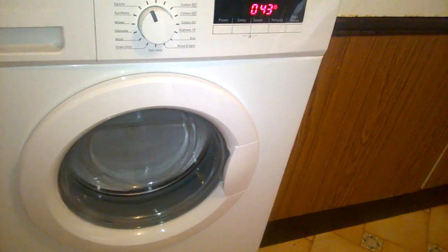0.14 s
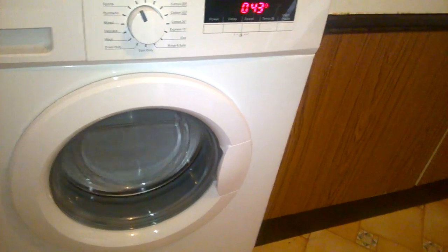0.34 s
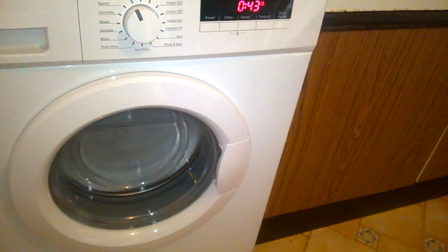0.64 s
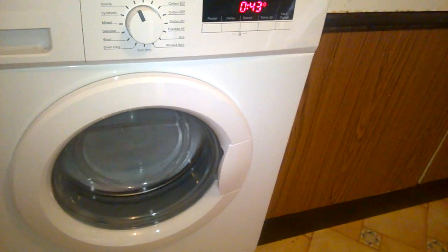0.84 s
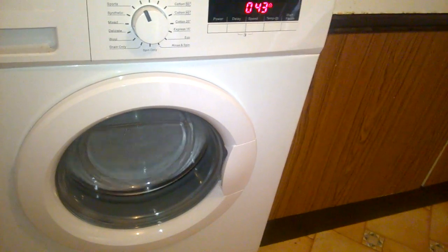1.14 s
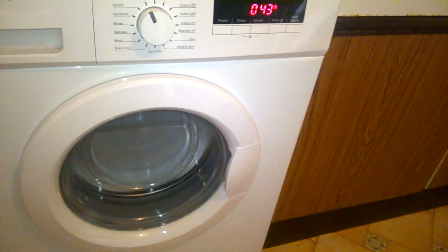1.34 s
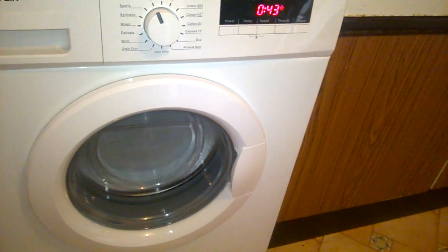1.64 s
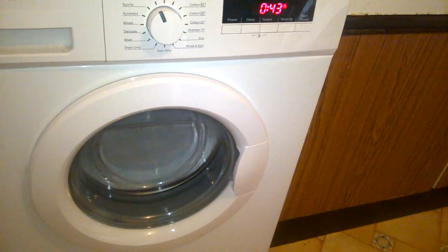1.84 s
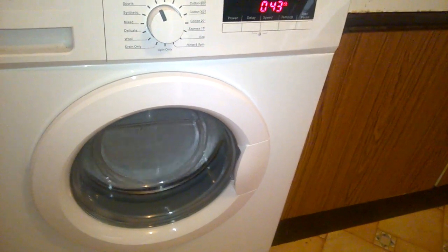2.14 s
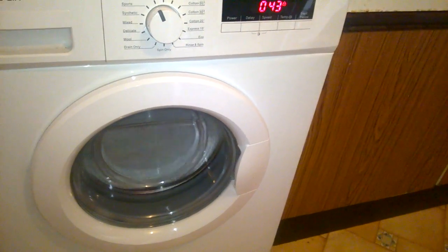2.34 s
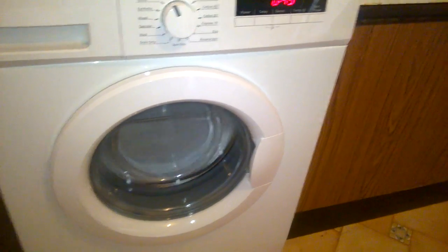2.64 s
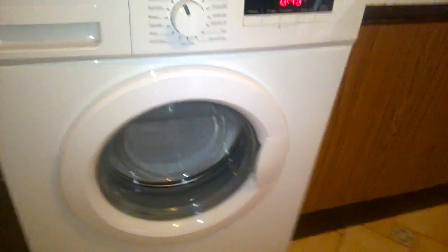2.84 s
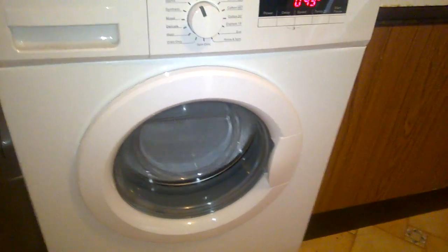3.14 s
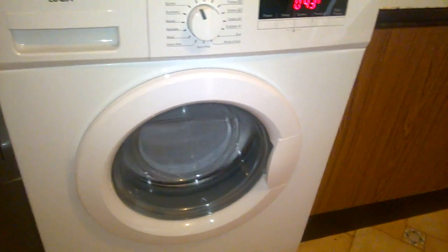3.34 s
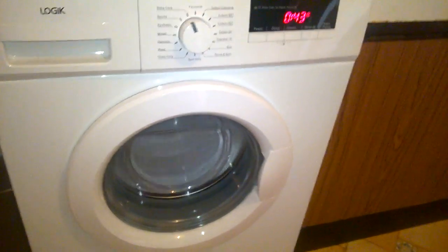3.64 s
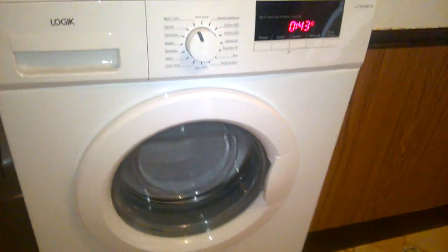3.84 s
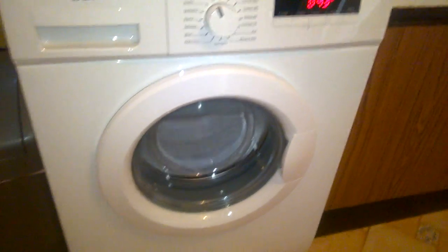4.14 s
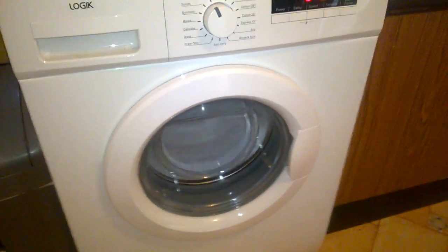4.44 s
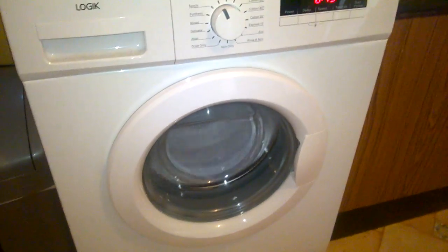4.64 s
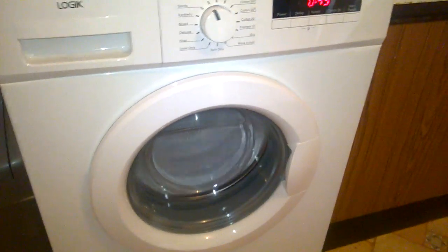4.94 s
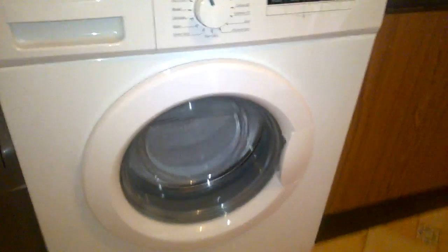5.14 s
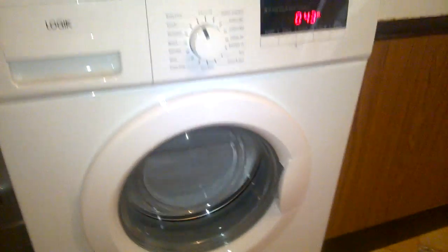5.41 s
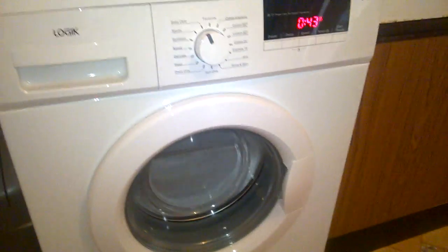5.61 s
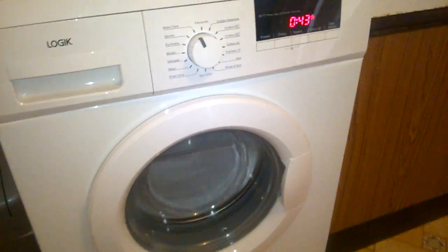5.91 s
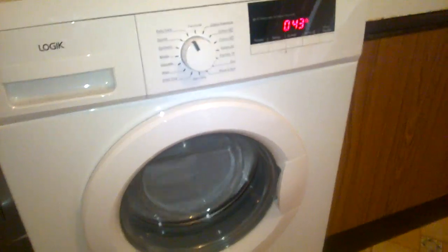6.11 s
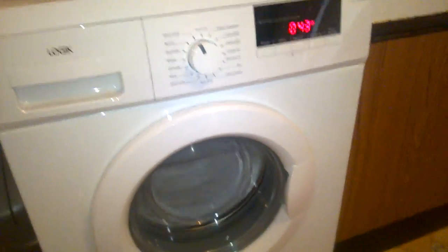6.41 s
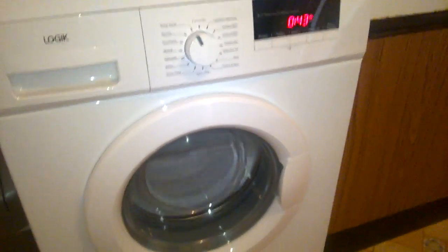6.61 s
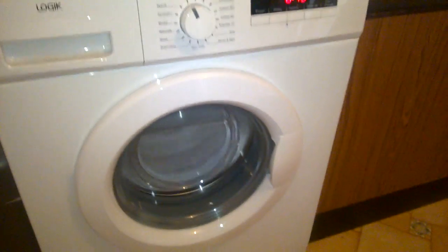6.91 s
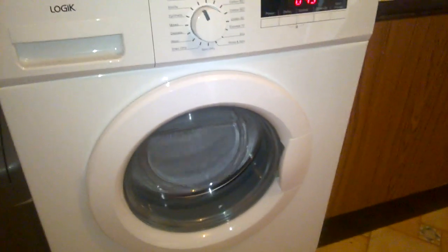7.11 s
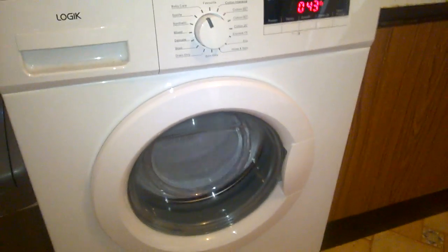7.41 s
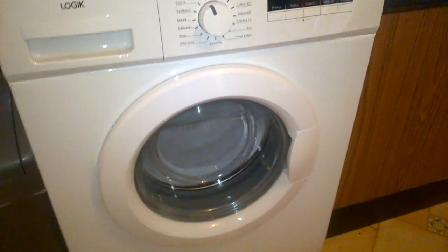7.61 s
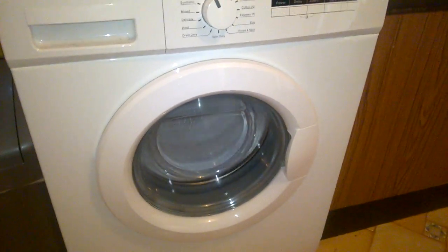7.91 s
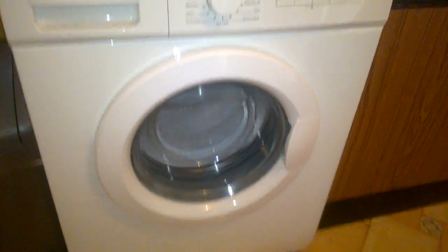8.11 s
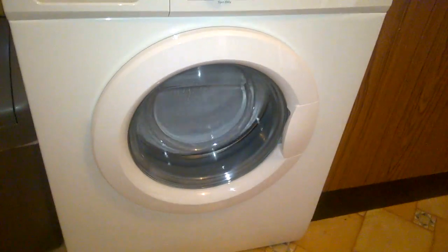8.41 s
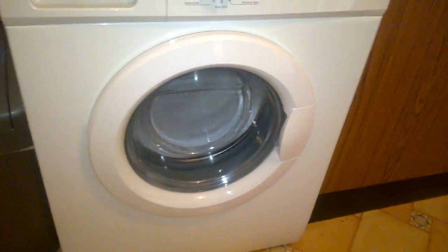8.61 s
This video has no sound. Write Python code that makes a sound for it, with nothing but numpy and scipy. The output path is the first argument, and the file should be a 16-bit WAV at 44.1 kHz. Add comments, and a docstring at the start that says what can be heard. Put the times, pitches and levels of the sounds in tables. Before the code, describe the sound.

Steady washing machine spin cycle with a piercing, fluttering motor whine, buzzing drum hum and hiss, a small click midway and handling rustle at the end.

```python
"""A front-loading washing machine spins at steady speed in a tiled kitchen, heard from a drifting hand-held phone.
The unbalanced drum shakes the cabinet on multiples of its turn; belt ribs and steady panel tones hum along.
A brushed motor, belted to the drum, whines on its 18 rotor slots over a comb of brush tones.
Every pass of the belt joint and of the drum's heavy side tugs the motor and dents the whine.
Bearings rumble and cooling air hisses beneath; fingers rub the phone, and near the end a hand slides over it."""
import sys
import numpy as np
from scipy import signal
from scipy.fft import rfft, irfft, next_fast_len
from scipy.io import wavfile
from scipy.ndimage import uniform_filter1d, map_coordinates

SR = 44100
rng = np.random.default_rng(int(sys.argv[2]) if len(sys.argv) > 2 else 0)


def gain_from_decibels(decibels):
    """Convert decibel values to linear amplitude factors."""
    exponent = np.asarray(decibels, float) / 20
    return 10 ** exponent


def log_audio(samples):
    """Write samples as a 16-bit WAV file to the path given in sys.argv[1]."""
    # one column per channel
    frames = np.atleast_2d(samples).T
    # limit to full scale, then quantise
    limited = np.clip(frames, -1, 1)
    pcm = np.round(limited * 32767).astype(np.int16)
    wavfile.write(sys.argv[1], SR, pcm)


N = 386316
TIME = np.arange(N) / SR

DRUM_HZ, BELT_HZ, SHAFT_HZ, MAINS_HZ = 10.132, 7.492, 116.52, 50.0  # turns or cycles a second
SLOTS = 18  # rotor slots, so whine cycles in each shaft turn


def unit(x):
    """Scaled to rms 1."""
    return x / np.sqrt(np.mean(np.abs(x) ** 2))


def curves(rows):
    """One value per sample for each column after the time."""
    s, *cols = np.transpose(rows)
    return [np.interp(TIME, s, c) for c in cols]


def wobble(rate):
    """A smooth random curve, rate knots a second."""
    coarse = TIME[::32]
    knots = rng.standard_normal(int(N * rate / SR) + 4)
    return np.interp(TIME, coarse, map_coordinates(knots, [coarse * rate]))


def noise(gain):
    """Noise coloured by a gain of frequency."""
    m = next_fast_len(N)
    hz = np.fft.rfftfreq(m, 1 / SR)
    re, im = rng.standard_normal((2, len(hz)))
    return irfft((re + 1j * im) * np.sqrt(m / 2) * gain(hz), m)[:N]


def rush(points, lo_hz, hi_hz):
    """Noise with a (frequency [Hz], gain [dB]) spectrum, of rms 1 between two frequencies."""
    f, db = np.transpose(points)
    gain = lambda hz: gain_from_decibels(np.interp(np.log(hz + 1), np.log(f + 1), db))
    band_power = np.sum(gain(np.arange(lo_hz, hi_hz)) ** 2) * 2 / SR
    return noise(gain) / np.sqrt(band_power)


def periodic(orders, turns, drift, start=None, count=2 ** 14):
    """A wave that repeats each turn; echoes at shifting strength let every multiple swell on its own."""
    k, db = np.transpose(orders)
    phase = rng.random((len(k), 3)).T  # in cycles: the direct wave, then two echoes
    if start:
        phase[0] = start(k, phase[0] - .5)
    lines = np.zeros((3, count // 2 + 1), complex)
    lines[:, k.astype(int)] = gain_from_decibels(db) * np.exp(2j * np.pi * phase) * count / np.sqrt(2)
    place = turns % 1 * count
    direct, *echoes = [np.interp(place, np.arange(count), w, period=count) for w in irfft(lines)]
    mixed = direct + drift * sum(wobble(0.865) * e for e in echoes)
    return mixed / np.sqrt(1 + 2 * drift ** 2)


def in_step(k, chance):
    """Six knocks a turn keep multiples 7, 13, 19.. together; the rest push against them, in cycles."""
    looseness = np.where(k < 7, 1, (k / 30) ** 2)  # low and high multiples hold step less well
    return .1 + .45 * (k % 6 != 1) + chance * looseness


# cabinet shaking, strongest multiples: (multiple of the drum turn, level [dB rms])
DRUM_SHAKES = [(2, -53.0), (3, -61.0), (4, -58.5), (5, -59.5), (6, -62.0), (7, -44.5), (9, -60.5),
               (10, -59.0), (11, -52.5), (12, -55.5), (13, -35.5), (14, -48.0), (15, -47.0), (16, -59.5),
               (17, -63.5), (18, -56.0), (19, -47.5), (20, -54.5), (21, -55.0), (23, -61.0), (24, -63.5),
               (25, -54.5), (27, -60.5), (29, -61.0), (31, -55.5)]
# weaker multiples above those: level of the first [dB rms], loss a multiple [dB], chance spread [dB]
TAIL_ORDERS = np.arange(32, 45)
TAIL_DB, TAIL_FALL_DB, TAIL_SCATTER_DB = -66.5, 0.5, 0.5


def drum():
    """The unbalanced load shakes the cabinet on multiples of the drum turn."""
    k = TAIL_ORDERS
    tail_db = TAIL_DB - TAIL_FALL_DB * (k - k[0]) + TAIL_SCATTER_DB * rng.standard_normal(len(k))
    orders = np.vstack([DRUM_SHAKES, np.transpose([k, tail_db])])
    turns = DRUM_HZ * TIME + 0.0025 * wobble(2.01)
    return periodic(orders, turns, drift=0.026, start=in_step)


# belt ribs on the pulleys: (multiple of the belt turn, level [dB rms])
BELT_RIBS = [(24, -60), (48, -87), (60, -58.5), (96, -58.5), (100, -66.5), (104, -70.5), (106, -68.5),
             (144, -65)]


def belt_ribs():
    """Ribs running over the pulleys hum on multiples of the belt turn."""
    return periodic(BELT_RIBS, BELT_HZ * TIME + 0.0025 * wobble(2.03), drift=0.095)


# panel tones of mains and bearings: (frequency [Hz], middle level [dB rms])
PANEL_TONES = [(190, -72), (200, -55.5), (300, -63.5), (320.3, -60), (516.7, -66.5), (549.5, -64.5),
               (732.6, -63.5), (774.9, -58.5), (837.4, -63), (879.4, -64), (952.2, -63), (989, -64)]


def panels():
    """Mains and bearings hold the panels at fixed pitches; the higher the tone, the more it flickers."""
    out = 0
    for hz, db in PANEL_TONES:
        level_db = db + 1.3 * wobble(.9) + hz / 250 * wobble(7)
        out = out + gain_from_decibels(level_db) * np.sqrt(2) * np.sin(2 * np.pi * (hz * TIME + rng.random()))
    return out


SWELL_DB, SWELL_HZ = 0.63, 2.284  # scale of each tone's chance swells [dB], their knots a second


def placed(rows):
    """Tone levels [dB] that follow the phone's place, as the two lowest whines do, and swell by chance."""
    first_db, second_db = [db - db.mean() for db in curves(WHINE_LEVELS)]
    return [db + a * first_db + b * second_db + SWELL_DB * wobble(SWELL_HZ) for db, a, b in rows]


# brush comb between the slot harmonics: (multiple of the shaft turn, level before the bar pattern [dB rms])
BRUSH_COMB = [(17, -64.5), (24, -80.5), (34, -64.5), (48, -61.5), (62, -61.5), (76, -63), (92, -65.5),
              (108, -70.6), (134, -77)]
# uneven commutator bars repeat one pattern above every slot harmonic: (multiples above it, gain [dB])
BAR_PATTERN = [(1, 0.8), (2, 5.5), (3, -6), (4, 1.9), (5, -4), (6, 0.3), (7, 3), (8, -6), (9, 0.5),
               (10, -12), (11, 5), (12, 4), (13, -4.5), (14, -6), (15, -14), (16, 5), (17, -0.5)]
BAR_SCATTER_DB = 4
# multiples of the shaft turn that stand clear of the comb
CLEAR_TONE_ORDERS = [20, 25, 28, 29, 32, 34, 40, 43, 47]
# those clear tones, in that order:
# (middle level [dB rms], gain per dB of the lowest whine [dB], gain per dB of the second [dB])
CLEAR_TONES = [(-63.5, -.05, .01), (-63, -0.5, .01), (-63.5, 0.12, .01), (-63, .5, .01), (-59.5, -.35, .01),
               (-71, -1.1, .01), (-60.5, .01, .01), (-63.5, -0.1, .01), (-58.5, 0.16, .01)]


def brushes(turns):
    """Commutator comb: the higher the multiple, the more of it blurs into a noisy skirt."""
    k = np.arange(BRUSH_COMB[0][0], BRUSH_COMB[-1][0] + 1).astype(int)
    k = k[(k % SLOTS > 0) & ~np.isin(k, CLEAR_TONE_ORDERS)]
    db = np.interp(k, *np.transpose(BRUSH_COMB)) + np.interp(k % SLOTS, *np.transpose(BAR_PATTERN))
    db = db + BAR_SCATTER_DB * rng.standard_normal(len(k))
    share = np.clip(k / 75, 0, .9)  # blurred part of each tone's power
    skirt = .46 - k * .0016  # dB per Hz
    grid = np.arange(SR // 2 + 1)  # Hz
    fall = gain_from_decibels(-skirt[:, None] * np.abs(grid - k[:, None] * SHAFT_HZ)) ** 2
    power = (gain_from_decibels(db) ** 2 * share / fall.sum(1)) @ fall * SR / 2
    blur = noise(lambda hz: np.sqrt(np.interp(hz, grid, power)))
    sharp = periodic(np.transpose([k, db + 10 * np.log10(1 - share)]), turns, drift=0.5)
    tones = 0
    for order, level_db in zip(CLEAR_TONE_ORDERS, placed(CLEAR_TONES)):
        # the drum's sway makes them pulse, the high ones most
        sway_db = .0025 * order ** 2 * np.sin(2 * np.pi * (DRUM_HZ * TIME + rng.random()))
        tone = np.sin(2 * np.pi * (order * turns + rng.random()))
        tones = tones + gain_from_decibels(level_db + sway_db) * np.sqrt(2) * tone
    return tones + sharp + blur


def tug(table, turns, depth, count=512):
    """Side tones that all oppose the carrier at the start of a turn."""
    angle = np.linspace(0, 1, count)
    spin = np.exp(2j * np.pi * angle)
    shape = sum(gain_from_decibels(below) * spin ** -int(k) + gain_from_decibels(above) * spin ** int(k) for k, below, above in table)
    return depth * np.interp(turns % 1, angle, shape)


# side tones beside the whine, before the dent depths scale them:
# (multiple of the turn or mains cycle, level below the whine's pitch [dB], level above it [dB])
BELT_JOINT_TUG = [(1, -21, -11), (2, -20, -15), (3, -20, -18), (4, -28, -30)]
HEAVY_SIDE_TUG = [(1, -21, -19), (2, -26, -22), (3, -32, -32), (4, -36, -36)]
MAINS_CYCLE_TUG = [(1, -23, -44), (2, -17.5, -43), (4, -26, -30)]
# levels of the two lowest whines at plain dents [dB], dent growth per dB below [dB], depth (factor)
NULL_DB, DENT_KEEPS, DENT_DEPTH = [-40.5, -41.5], 0.86, 0.79


def dents(k, db, belt, heavy):
    """Belt joint, heavy side and mains each pull whine harmonic k back once a turn or cycle."""
    # higher harmonics come by other paths, so their dents fall at other moments
    late = (k > 1) * rng.random(3)
    pulls = tug(BELT_JOINT_TUG, belt - late[0], k ** -.6)
    pulls = pulls + tug(HEAVY_SIDE_TUG, heavy - late[1], k ** 1.14)
    pulls = pulls + tug(MAINS_CYCLE_TUG, MAINS_HZ * TIME - late[2], k ** -.4)
    # where the room cancels the two lowest whines, their side tones keep more of their strength
    kept_db = DENT_KEEPS * (NULL_DB[k - 1] - db) if k < 3 else 0
    return pulls * DENT_DEPTH * gain_from_decibels(kept_db)


# the phone drifts through the room's standing waves:
# (time [s], level of the lowest whine [dB rms], level of the second [dB rms])
WHINE_LEVELS = [(0.0, -44, -46), (1.0, -53.5, -43), (2.17, -51.5, -49), (2.32, -58, -46.5),
                (3.17, -40, -48), (3.9, -43.5, -45.5), (3.98, -39, -45), (5.39, -36.5, -40.5),
                (6.05, -38.5, -46.5), (6.54, -40, -44.5), (8.64, -34.5, -38), (8.76, -35.5, -39)]
# whine harmonics 3 to 7:
# (middle level [dB rms], gain per dB of the lowest whine [dB], gain per dB of the second [dB])
WHINE_OVERTONES = [(-43, -0.04, 0.21), (-40.5, 0.15, 0.2), (-42, 0.14, -0.47), (-53.5, .01, -0.03),
                   (-56.5, .01, .01)]
# each whine harmonic smeared into noise: (share of power [0-1], skirt [dB per Hz])
WHINE_SMEAR = [(.01, .5), (.12, .4), (.3, .34), (.55, .32), (.65, .3), (.75, .27), (.75, .27)]
# around the room's null the lowest whine turns in phase, so its dents become beats
FLIP_S, FLIP_BACK_S, FLIP_TURN_S, FLIP_RAD = 0.7, 2.53, .15, 1.96  # from, to, turning time [s]; angle [rad]


def whine(shaft, rock, belt, heavy):
    """Slot harmonics of the shaft turn, each part steady and dented, part smeared by flutter."""
    there = np.tanh((TIME - FLIP_S) / FLIP_TURN_S)
    back = np.tanh((TIME - FLIP_BACK_S) / FLIP_TURN_S)
    flip = np.exp(.5j * FLIP_RAD * (there - back))
    out = 0
    levels = curves(WHINE_LEVELS) + placed(WHINE_OVERTONES)
    for k, (db, (share, skirt)) in enumerate(zip(levels, WHINE_SMEAR), 1):
        steady = (flip if k == 1 else 1) - dents(k, db, belt, heavy)
        # dents shape the tone within each half second but leave its level
        steady = steady / np.sqrt(uniform_filter1d(np.abs(steady) ** 2, size=SR // 2))
        # the rocking bends every harmonic but the lowest
        steady = steady * np.exp(2j * np.pi * 1.01 * (k - 1) * SLOTS * rock)
        # the blur is quick flutter: little of it lies within a few Hz of the tone
        flutter = lambda hz: gain_from_decibels(-skirt * hz) * hz / (hz + 5)
        smear = unit(noise(flutter) + 1j * noise(flutter))
        mixed = np.sqrt(1 - share) * steady + np.sqrt(share) * smear
        carrier = np.exp(2j * np.pi * (k * SLOTS * shaft + rng.random()))
        out = out + gain_from_decibels(db) * np.sqrt(2) * np.real(mixed * carrier)
    return out


JOINT_S, HEAVY_S = .015, .087  # first pass of the belt joint and of the drum's heavy side [s]


def motor():
    """Slot whine and brush comb share one shaft angle, which belt and drum rock to and fro."""
    belt, heavy = BELT_HZ * (TIME - JOINT_S), DRUM_HZ * (TIME - HEAVY_S)
    rock = 0.0031 * np.sin(2 * np.pi * belt) + 0.0018 * np.sin(4 * np.pi * belt)  # shaft turns
    rock = rock + 0.0014 * np.sin(2 * np.pi * heavy)
    shaft = SHAFT_HZ * TIME + 0.0088 * wobble(1.5) + 0.00042 * wobble(25)
    return brushes(shaft + rock) + whine(shaft, rock, belt, heavy)


# colour of the cabinet rumble: (frequency [Hz], relative level [dB])
RUMBLE_COLOUR = [(15, 1), (40, -1), (130, 10), (250, 1), (420, 1), (620, -2), (760, 2), (1100, -2.5),
                 (1500, -13), (2100, -9), (3200, -42), (5000, -58)]
RUMBLE_DB, RUMBLE_SAG_DB_PER_S = -47, 0.29  # level at the start, 360-1700 Hz, before the throb; slow loss


def bearings():
    """Bearings rumble in the cabinet, throbbing with the drum and by chance."""
    throb_db = 0.22 * np.sin(2 * np.pi * DRUM_HZ * TIME) + 1.1 * wobble(30) + 0.77 * wobble(2.5)
    return gain_from_decibels(RUMBLE_DB - RUMBLE_SAG_DB_PER_S * TIME + throb_db) * rush(RUMBLE_COLOUR, 360, 1700)


def patchy(x, patchy_db):
    """Random patches of gain over time and frequency."""
    z = signal.stft(x, nperseg=512)[2]
    field = uniform_filter1d(rng.standard_normal(z.shape), size=4, axis=0)  # across frequency
    field = uniform_filter1d(field, size=8, axis=1)  # across time
    return signal.istft(z * gain_from_decibels(patchy_db * unit(field)), nperseg=512)[1][:N]


# colour of the cooling air: (frequency [Hz], relative level [dB])
AIR_COLOUR = [(800, -22), (1600, -7.5), (2100, -2), (2800, -5), (3800, 0.5), (5200, 0), (6300, 3.5),
              (8300, 6.5), (10400, 6.5), (12000, -3.5), (13500, -5.5), (15500, -6)]
HISS_DB = -55.5  # in 4440-5950 Hz, before patches and wobbles


def cooling_air():
    """The motor's cooling air hisses, uneven in time and frequency."""
    level_db = HISS_DB + 0.44 * wobble(12) + 0.82 * wobble(1.43)
    return gain_from_decibels(level_db) * patchy(rush(AIR_COLOUR, 4440, 5950), patchy_db=3)


# fingers shifting on the phone:
# (time of the peak [s], level at the peak [dB rms], length [s], centre [Hz], width [Hz]);
# length and width are standard deviations of bell curves
FINGER_RUBS = [(5.242, -38, 0.006, 6500, 3000), (5.249, -30, 0.0018, 7500, 2800),
               (8.13, -48, 0.039, 1310, 450)]


def finger_rubs():
    """Fingers rub the phone's case: short bell-shaped bursts of band noise."""
    out = 0
    for s, db, life, hz, wide in FINGER_RUBS:
        burst = unit(noise(lambda f: np.exp(-.5 * ((f - hz) / wide) ** 2)))
        out = out + gain_from_decibels(db) * np.exp(-.5 * ((TIME - s) / life) ** 2) * burst
    return out


# colour of the hand's slide: (frequency [Hz], relative level [dB])
HAND_COLOUR = [(60, -39), (200, 1), (500, 1), (1000, -1), (1500, -6), (2200, -11), (3500, -18), (6000, -55)]
SLIDE_S, SLIDE_RISE_S = 8.12, 0.085  # start, fade-in [s]
SLIDE_DB, SLIDE_GROWS_DB_PER_S = -48, 7  # level the growth sets out from, in 370-1700 Hz; growth


def hand_slide():
    """The hand slides over the phone: a quick rise, then rough noise that grows to the end."""
    since = TIME - SLIDE_S
    level_db = SLIDE_DB + SLIDE_GROWS_DB_PER_S * since + 1.8 * wobble(25)
    return np.clip(since / SLIDE_RISE_S, 0, 1) * gain_from_decibels(level_db) * rush(HAND_COLOUR, 370, 1700)


def scene():
    """Machine and hand, one channel."""
    machine = drum() + belt_ribs() + panels() + motor() + bearings() + cooling_air()
    return (machine + finger_rubs() + hand_slide())[None]


def low_pass(x):
    """Removes everything above the highest recorded frequency."""
    return signal.sosfilt(signal.butter(12, 16400, fs=SR, output="sos"), x)


def record(dry):
    """The phone keeps nothing above its band limit."""
    below_limit = np.fft.rfftfreq(N, 1 / SR) < 15750  # Hz
    mix = irfft(rfft(dry) * below_limit, N)
    return low_pass(mix)


dry = scene()
out = record(dry)
log_audio(out)
```